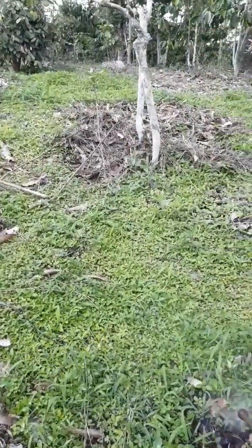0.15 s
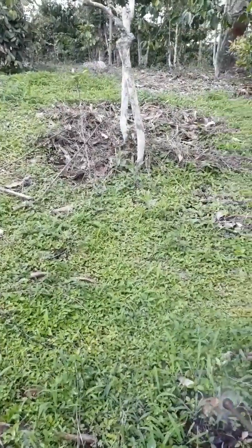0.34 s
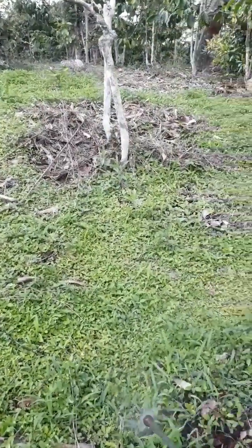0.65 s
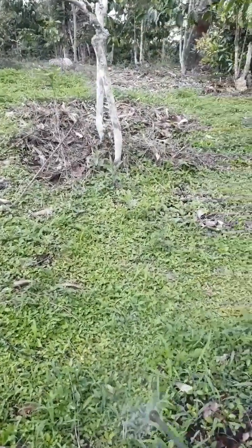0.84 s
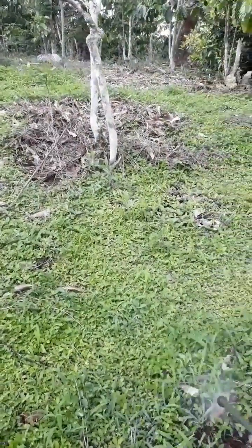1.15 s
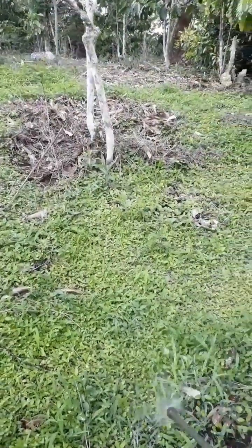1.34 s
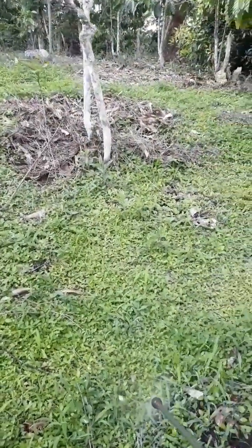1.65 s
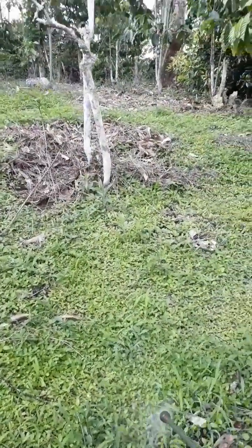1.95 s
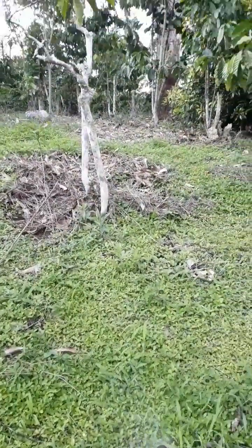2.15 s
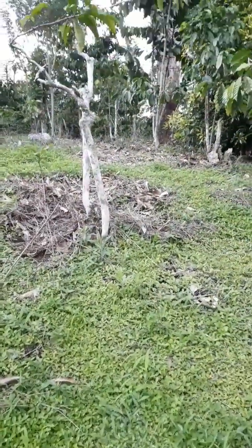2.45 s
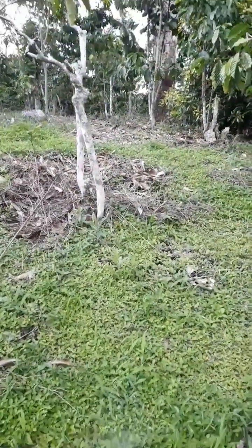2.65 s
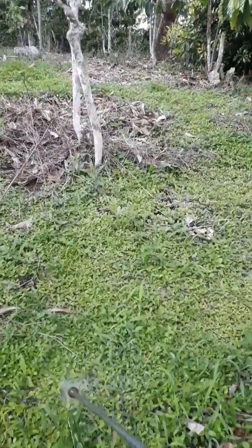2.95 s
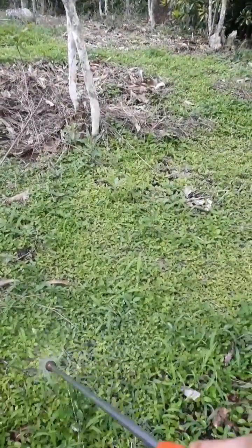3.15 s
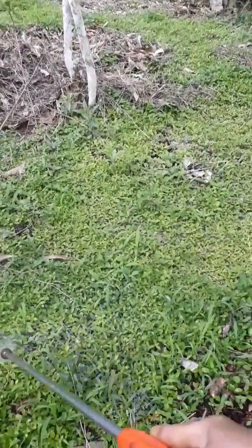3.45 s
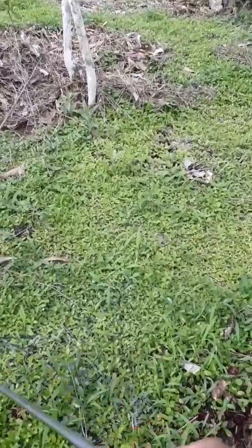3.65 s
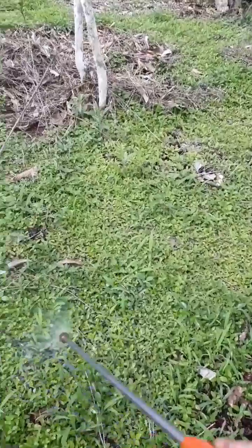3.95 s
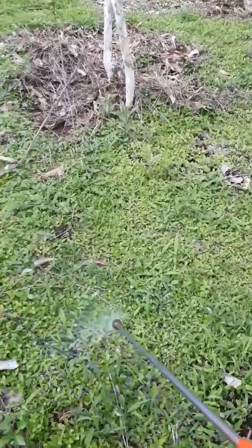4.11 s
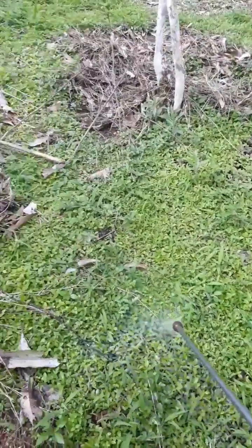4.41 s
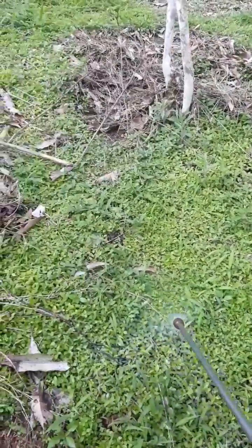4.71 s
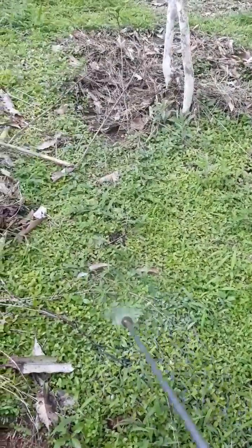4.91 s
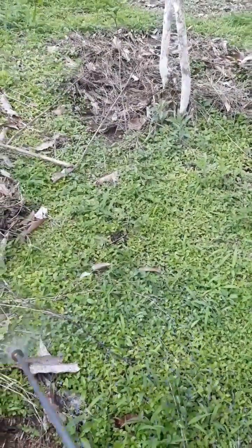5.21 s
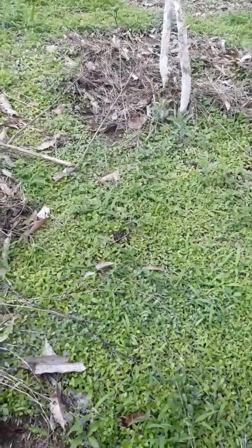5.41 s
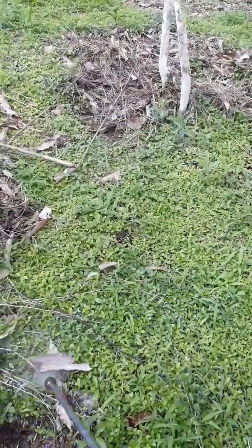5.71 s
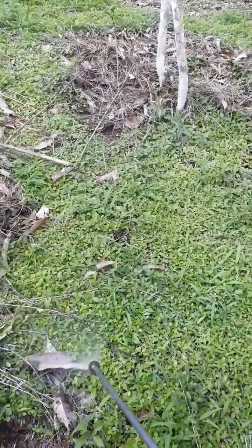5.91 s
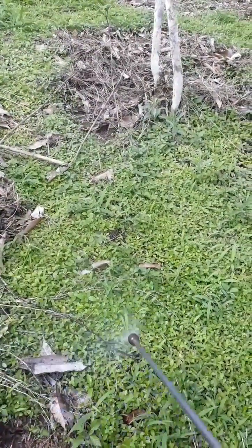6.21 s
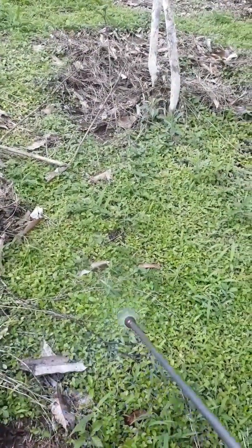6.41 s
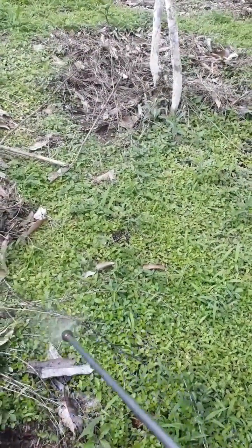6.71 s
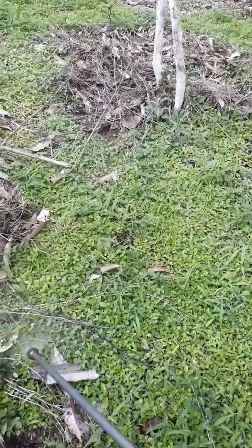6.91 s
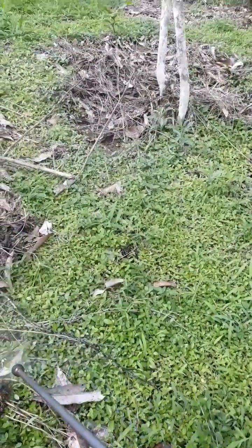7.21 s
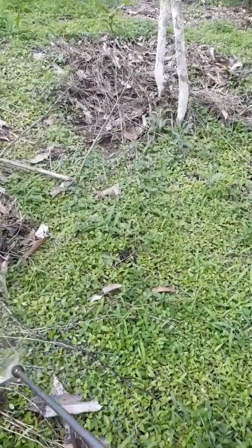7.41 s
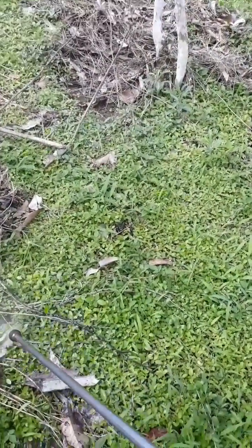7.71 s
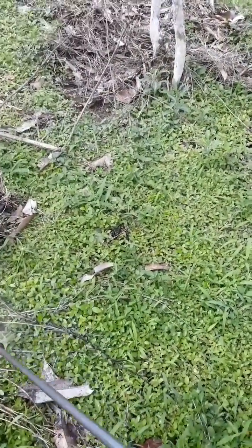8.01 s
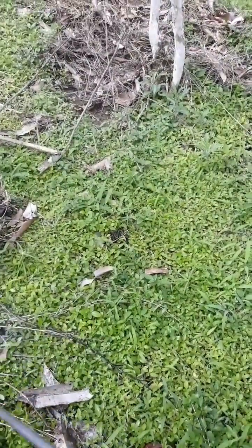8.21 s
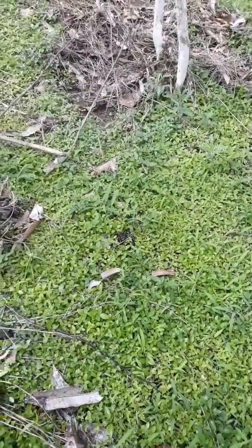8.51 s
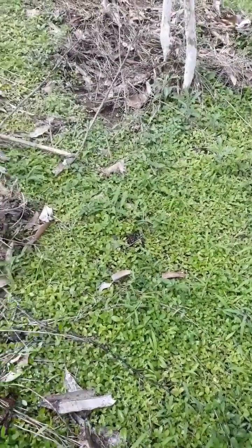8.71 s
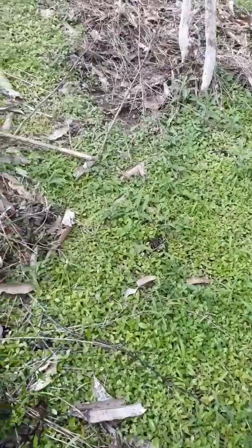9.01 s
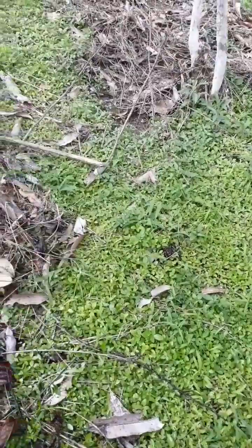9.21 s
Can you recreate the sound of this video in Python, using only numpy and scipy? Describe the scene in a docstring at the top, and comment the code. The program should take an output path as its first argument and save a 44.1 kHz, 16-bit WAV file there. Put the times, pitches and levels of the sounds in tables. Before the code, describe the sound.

A steady, bright nozzle hiss fills an open orchard, heard close and centred in mono over a faint low air bed. Fine droplets fizz on green leaves and patter drily on litter in uneven passes. Early low wind buffets bump the microphone, with weaker ones around four and a half seconds. Small hard ticks and short rustles dot the spray, which is fullest in the last seconds and never stops.

```python
"""An orchard, where a hand lance sprays a fine mist over the ground, close to a mono microphone.
The nozzle is steady turbulent hiss; the sweeping mist is noise and clicks, coloured by green leaves or dry litter.
Ground echoes comb the spray. Puffs of wind buffet the microphone as low noise and single pressure swings.
The lance and a few large drops tick with damped modes, and leaves rustle in brief bands of noise."""
import sys
import numpy as np
from scipy import signal
from scipy.fft import rfft, irfft
from scipy.io import wavfile
from scipy.ndimage import uniform_filter1d

SR = 44100
rng = np.random.default_rng(int(sys.argv[2]) if len(sys.argv) > 2 else 0)


def master_out(mix):
    """Clip the mix to full scale and print it as 16-bit PCM to the path in sys.argv[1]."""
    frames = np.transpose(np.atleast_2d(mix))
    ceiling = np.clip(frames, -1, 1)
    pcm = np.round(ceiling * 32767).astype(np.int16)
    wavfile.write(sys.argv[1], SR, pcm)


N = 412335  # length in samples
FRAME = 512  # samples in a frame of the moving filters
TIME = np.arange(N) / SR


def amp(db):
    """Turns decibels into gain."""
    return 10 ** (np.asarray(db) / 20)


def evened(x):
    """Scales a signal or field to an rms of 1."""
    return x / np.sqrt(np.mean(x ** 2) + 1e-20)


def spectrum(points, hz):
    """Reads a (freq_hz, level_db) table on a log-frequency axis."""
    point_hz, point_db = np.transpose(points)
    return np.interp(np.log(hz + 1), np.log(point_hz + 1), point_db)


def curves(rows, t):
    """Reads every column of a timed table at the times t, gliding between rows."""
    row_s, *columns = np.transpose(rows)
    return [np.interp(t, row_s, column) for column in columns]


def swells(rows, t, rise_db_per_s, fall_db_per_s):
    """Power of each (start, length, level) row at the times t: it rises before the start, holds and falls."""
    start, length, level_db = np.transpose(rows)[:3, :, None]
    early = np.maximum(start - t, 0)
    late = np.maximum(t - start - length, 0)
    swell_db = level_db - rise_db_per_s * early - fall_db_per_s * late
    return amp(np.maximum(swell_db, -600)) ** 2


def add(mix, start_s, sound):
    """Mixes a sound in at start_s seconds."""
    part = mix[max(round(start_s * SR), 0):][:len(sound)]
    part += sound[:len(part)]


def coloured(x, points):
    """Filters x by a fixed spectrum."""
    hz = np.fft.rfftfreq(len(x), 1 / SR)
    return irfft(rfft(x) * amp(spectrum(points, hz)), len(x))


def shaped(x, field_db, size=FRAME):
    """Filters x by a moving spectrum, field_db(hz, t)."""
    overlap = size * 3 // 4
    hz, t, frames = signal.stft(x, SR, nperseg=size, noverlap=overlap)
    frames = frames * amp(field_db(hz[:, None], t))
    return signal.istft(frames, SR, nperseg=size, noverlap=overlap)[1][:N]


def patches(hz, t, wide_hz, long_s):
    """Random field smoothed over frequency and time, rms 1."""
    field = rng.standard_normal((len(hz), len(t)))
    bins = max(round(wide_hz * FRAME / SR), 1)
    frames = max(round(long_s / t[1]), 1)
    field = uniform_filter1d(field, bins, 0)
    return evened(uniform_filter1d(field, frames, 1))


def white():
    """Noise of 0 dB per Hz."""
    return np.sqrt(SR / 2) * rng.standard_normal(N)


# outdoor air: freq_hz [Hz], level_db [dB per Hz]
AIR_SPECTRUM = [(20, -116), (45, -86), (80, -82), (135, -75), (200, -85.5), (290, -80.5), (390, -76),
                (600, -87.5)]


def air():
    """The low, steady noise bed of the air outdoors."""
    return coloured(white(), AIR_SPECTRUM)


# puffs of wind on the microphone: start_s [s], length_s [s], level_db [relative dB]
WIND_PUFFS = [(1.135, 0.011, -35), (1.205, .04, -32), (1.32, 0.094, -17.5), (1.45, 0.11, -22),
              (1.6, 0.12, -18), (1.88, 0.13, -26.5), (2.035, 0.013, -17.5), (2.16, 0.034, -26.5),
              (2.46, 0.21, -38.5), (4.54, .025, -38), (4.64, .03, -44), (4.72, 0.032, -36),
              (4.833, 0.011, -33), (7.87, .02, -50), (8.0, .05, -47)]
# colour of a full gust: freq_hz [Hz], level_db [relative dB]
FULL_GUST_SPECTRUM = [(15, -62), (35, -20), (70, 0.5), (110, 1), (160, 1.5), (260, -6.5), (400, -21),
                      (650, -41), (1200, -55), (3000, -90)]


def wind(level_db=-3, full_db=-21, dulling=1.0, knee_hz=130, rise_db_per_s=450, fall_db_per_s=286):
    """Lumpy low turbulence at the microphone; weak gusts are duller than strong ones."""
    gust_power = swells(WIND_PUFFS, TIME, rise_db_per_s, fall_db_per_s).max(0)
    gust_db = 10 * np.log10(gust_power)

    def dullness(hz, t):
        """Treble loss in dB, deeper the further a gust is below full strength."""
        weakness_db = np.clip(full_db - np.interp(t, TIME, gust_db), 0, 20)
        return -dulling * weakness_db * np.log2(1 + (hz / knee_hz) ** 2) / 2

    flow = shaped(coloured(white(), FULL_GUST_SPECTRUM), dullness)
    # level out the flow, so that the gust alone sets the strength
    flow = flow / np.sqrt(uniform_filter1d(flow ** 2, size=2200) + 1e-12)
    return flow * amp(gust_db + level_db)


# strongest eddies at the microphone: centre_s [s], peak_db [relative dB], pitch_hz [Hz]
EDDY_THUMPS = [(1.341, -12, 111), (1.477, -11, 207), (1.519, -7, 159), (1.603, -8.5, 208),
               (1.635, -15, 198), (1.709, -12.5, 139), (1.726, -18, 260), (2.048, -11.5, 169),
               (2.545, -28, 108), (2.64, -26, 100), (4.546, -25.5, 112), (4.719, -27.5, 100)]


def thumps(level_db=-2):
    """Each eddy thumps the microphone with one swing of pressure, down and up."""
    out = np.zeros(N)
    t = np.arange(-900, 900) / SR
    for centre_s, peak_db, pitch_hz in EDDY_THUMPS:
        phase = 2 * np.pi * pitch_hz * t
        swing = phase * np.exp((1 - phase ** 2) / 2)
        add(out, centre_s + t[0], amp(peak_db + level_db) * swing)
    return out


# rustles and splashes among the leaves: start_s [s], length_s [s], level_db [dB rms], centre_hz [Hz]
LEAF_RUSTLES = [(0.204, .22, -44.5, 2140), (1.81, 0.057, -41, 3220), (3.601, 0.27, -42, 1880),
                (3.867, 0.019, -32.5, 6040), (3.87, 0.077, -43, 900), (3.908, .04, -36, 3180),
                (6.757, .02, -41, 1000), (6.89, .014, -37, 2400), (8.252, 0.22, -44, 1800),
                (8.665, .055, -40.5, 590), (8.714, 0.02, -36, 860)]


def rustles(width_octaves=0.32):
    """Brief scuffs of noise, each in its own band."""
    out = np.zeros(N)
    for start_s, length_s, level_db, centre_hz in LEAF_RUSTLES:
        n = round(length_s * SR)
        octaves = np.log2((np.fft.rfftfreq(n, 1 / SR) + 1) / centre_hz)
        band = np.exp(-(octaves / width_octaves) ** 2 / 2)
        scuff = irfft(rfft(rng.standard_normal(n)) * band, n)
        add(out, start_s, amp(level_db) * evened(scuff * signal.windows.tukey(n, 0.5)))
    return out


# sharp ticks of the lance and of large drops: start_s [s], level_db [relative dB],
# tilt_db [dB per octave, about 4 kHz]
TICK_HITS = [(3.2439, -7.5, 1), (4.1220, -13.5, 2), (5.4277, -22, 4), (6.5648, -20.5, 3),
             (6.8931, -14.5, 3), (7.4573, -22, 6), (7.5147, -21, 13), (7.6753, -21, 3), (7.9184, -20, 11)]
# modes that a tick rings: pitch_hz [Hz], level_db [relative dB], t60_s [s to fall by 60 dB]
TICK_RINGS = [(906, -19, 0.029), (1620, -13, 0.0091), (3020, -8.5, 0.0041), (3750, -2.5, 0.0063),
              (4430, 0, 0.0037), (7660, -11, .004)]


def ticks(level_db=0, low_hz=600):
    """Short blows ring a few heavily damped modes."""
    out = np.zeros(N)
    t = np.arange(2000) / SR
    for start_s, hit_db, tilt_db in TICK_HITS:
        for pitch_hz, mode_db, t60_s in TICK_RINGS:
            start_db = hit_db + mode_db + tilt_db * np.log2(pitch_hz / 4000)
            ring_db = start_db - 60 * t / t60_s
            add(out, start_s, amp(ring_db + level_db) * np.sin(2 * np.pi * pitch_hz * t))
    # small parts radiate no bass
    bass_cut = signal.butter(2, low_hz, "highpass", fs=SR, output="sos")
    return signal.sosfilt(bass_cut, out)


def patter(per_s, spread_db, share):
    """Tiny droplets blur to noise; larger ones, with their share of the power, click singly. 0 dB per Hz."""
    size_db = spread_db * np.minimum(rng.exponential(1, N), 5)
    size = amp(size_db) * rng.choice([-1, 1], N)
    clicks = evened(size * (rng.random(N) < per_s / SR))
    return np.sqrt(1 - share) * white() + np.sqrt(share * SR / 2) * clicks


# mist on dry litter: freq_hz [Hz at pitch factor 1], level_db [relative dB per Hz]
LITTER_SPECTRUM = [(990.0, -83), (2470.0, -71), (3020.0, -74), (3330.0, -63.5), (3600.0, -64),
                   (4000.0, -62.5), (4470.0, -65), (5380.0, -63.5), (6710.0, -79.5), (7500.0, -68.5),
                   (9130.0, -79.5), (15390.0, -74.5)]
# the mist crosses dry litter: start_s [s], length_s [s], level_db [relative dB], pitch [factor],
# ring_hz [Hz of one leaf's lower mode], ring_db [dB added at that mode]
LITTER_SWEEPS = [(0, 0.36, -3, .94, 3040, 2.5), (.52, 0.24, -7.5, 0.91, 3420, 5.5),
                 (0.946, 0.34, -7, 1, 3850, 4), (1.5, 0.45, -11.5, 0.97, 3500, 1),
                 (2.02, 0.18, -5.5, 0.95, 3550, 1), (2.33, 0.62, -8, 0.94, 3550, 1.5),
                 (3.75, .03, -4.5, .91, 3550, 1), (3.907, .03, -3, 0.97, 3550, -4),
                 (6.806, 0.12, -7, 1.16, 3650, 6), (7.04, 0.48, -0.5, 1.004, 3650, 9.5),
                 (7.65, 0.29, -2.5, 0.98, 3640, 6.5), (8.094, 0.29, 1.9, 0.96, 3630, 6.5),
                 (8.657, 0.2, -7, 0.78, 3450, 0), (8.95, 0.28, -5, 0.92, 3100, 5)]


def litter(hz, t, body_db=-1.54, rest_db=-25, rise_db_per_s=59, fall_db_per_s=80, patchy_db=0.5,
           flutter_db=1.16, ring_width_hz=190, upper_hz=5080, upper_share=0.22):
    """Dry leaves under mist ring in a broad band set by their size; one leaf has two modes of its own."""
    passes = swells(LITTER_SWEEPS, t, rise_db_per_s, fall_db_per_s)
    # the patch that takes most of the mist sets the colour
    pitch, ring_hz, ring_db = np.transpose(LITTER_SWEEPS)[3:] @ (passes / passes.sum(0))
    lower_mode = 1 / (1 + ((hz - ring_hz) / ring_width_hz) ** 2)
    upper_mode = upper_share / (1 + ((hz - upper_hz) / ring_width_hz) ** 2)
    colour_db = spectrum(LITTER_SPECTRUM, hz / pitch) + ring_db * (lower_mode + upper_mode)
    level_db = body_db + 10 * np.log10(passes.sum(0) + amp(rest_db) ** 2)
    flutter = flutter_db * patches(hz, t, wide_hz=8900, long_s=0.02)
    patchiness = patchy_db * patches(hz, t, wide_hz=400, long_s=0.14)
    return colour_db + level_db + flutter + patchiness


# mist on green leaves: freq_hz [Hz], level_db [relative dB per Hz]
LEAF_SPECTRUM = [(600.0, -83.5), (1120.0, -78), (1430.0, -68.5), (2300.0, -71), (3100.0, -68),
                 (3980.0, -59.5), (5140.0, -58), (6530.0, -67), (7980.0, -64.5), (10100.0, -76),
                 (12920.0, -70.5), (15500.0, -69)]
# the mist crosses green leaves: start_s [s], length_s [s], level_db [relative dB]
LEAF_SWEEPS = [(.48, .04, -10), (1.1, 0.71, -14.5), (3.0, .4, -13.5), (3.53, 0.23, -5.5),
               (3.9, 0.26, -13.5), (5.33, 0.34, 0), (5.95, 0.035, -7.5), (6.3, 0.24, -14),
               (7.03, .66, -6.5), (7.9, 0.13, -10.5), (8.28, 0.48, -4), (8.68, 0.27, -2.5),
               (9.22, 0.15, -7)]


def leaves(hz, t, rest_db=-19, rise_db_per_s=79, fall_db_per_s=54, patchy_db=1.17, flutter_db=0.44):
    """Mist on green leaves: a bright fizz that swells with each pass and flutters as they shake."""
    passes = swells(LEAF_SWEEPS, t, rise_db_per_s, fall_db_per_s)
    level_db = 10 * np.log10(passes.max(0) + amp(rest_db) ** 2)
    flutter = flutter_db * patches(hz, t, wide_hz=9000, long_s=0.017)
    patchiness = patchy_db * patches(hz, t, wide_hz=600, long_s=0.11)
    return spectrum(LEAF_SPECTRUM, hz) + level_db + flutter + patchiness


# nozzle hiss before its aim is applied: freq_hz [Hz], level_db [dB per Hz]
NOZZLE_SPECTRUM = [(300.0, -78), (420.0, -78.5), (600.0, -78), (1020.0, -77.5), (1240.0, -76),
                   (1590.0, -75), (1930.0, -72.5), (2700.0, -74.5), (4590.0, -78), (6300.0, -72),
                   (10120.0, -82), (13200.0, -79), (14440.0, -78), (15490.0, -80)]
# how the nozzle faces the microphone: time_s [s], hiss_db [relative dB],
# tilt_db [dB per octave, about 3 kHz], sizzle_db [dB added to the top treble]
NOZZLE_AIM = [(0, 0, 0.6, 1), (.7, -1.4, -1.1, 4), (1.2, -0.7, -0.6, 4), (1.8, -4, -1, 7),
              (2.4, -1, -.5, 2), (2.9, -2, -1, 5), (3.4, -1.5, -.4, 6), (3.77, 1.1, -0.9, -9),
              (4.2, -.6, -.2, 0), (4.9, .5, 0.2, -6), (5.4, -2, 0, 5), (5.9, 2.5, 0.8, -4),
              (6.45, -0.8, -1.5, 4), (6.85, 1.5, -.5, -1), (7.45, -1.3, -0.5, -2), (8.1, 1.5, 0.6, -11),
              (8.45, 4.8, 1.7, -5), (9.35, 4, 0.9, -5)]


def nozzle(hz, t, patchy_db=1.1, low_hz=260, sizzle_hz=14500, sizzle_width_hz=1700):
    """Turbulent hiss whose level, tilt and top sizzle follow how the nozzle faces the microphone."""
    hiss_db, tilt_db, beam_db = curves(NOZZLE_AIM, t)
    low_cut_db = -10 * np.log10(1 + (low_hz / (hz + 1)) ** 6)
    octaves = np.log2(np.maximum(hz, low_hz) / 3000)
    body_db = spectrum(NOZZLE_SPECTRUM, hz) + hiss_db + tilt_db * octaves
    # the highest treble leaves the nozzle in a narrow beam
    sizzle_db = beam_db * np.exp(-((hz - sizzle_hz) / sizzle_width_hz) ** 2)
    patchiness = patchy_db * patches(hz, t, wide_hz=500, long_s=0.39)
    return body_db + sizzle_db + low_cut_db + patchiness


def echo_band(hz, low_hz=450, top_hz=3300):
    """The ground returns the middle of the spectrum; grass swallows the treble."""
    treble_loss = 1 / (1 + (hz / top_hz) ** 4)
    bass_loss = 1 / (1 + (low_hz / (hz + 1)) ** 4)
    return treble_loss * bass_loss


# ground echoes as the lance is raised and lowered: time_s [s], upright_ms [ms delay],
# upright [strength 0-1], inverted_ms [ms delay], inverted [strength 0-1]
GROUND_ECHOES = [(0, 1.65, 0.16, 1.2, .2), (.9, 1.52, 0.27, 1.07, .28), (1.4, 1.66, .1, 1.28, .04),
                 (2.8, 1.67, 0.23, 1.3, 0.18), (4, 1.63, 0.15, 1.35, 0.2), (4.5, 1.44, .28, 1.6, .13),
                 (5, 1.5, .38, 1.82, 0.24), (5.5, 1.24, .1, 1.83, 0.1), (6.45, 1.56, 0.25, 1.87, .24),
                 (7.05, 1.5, 0.12, 1.06, 0.01), (8.4, 1.25, 0, 1.03, .24), (9.35, 1.44, .1, 1.06, 0.02)]


def ground_echo(hz, t):
    """Two echoes off the ground cut combs into the spray that slide with the height of the lance."""
    upright_ms, upright, inverted_ms, inverted = curves(GROUND_ECHOES, t)
    turn_per_ms = -2j * np.pi * hz / 1000
    echoes = upright * np.exp(turn_per_ms * upright_ms) - inverted * np.exp(turn_per_ms * inverted_ms)
    return 20 * np.log10(abs(1 + echo_band(hz) * echoes) + 1e-6)


def spray():
    """Nozzle hiss and the patter of mist on leaves and litter, combed by the ground echoes."""
    direct = shaped(white(), nozzle)
    direct += shaped(patter(per_s=3500, spread_db=4.0, share=0.25), leaves)
    direct += shaped(patter(per_s=2200, spread_db=2.5, share=0.22), litter)
    # longer frames resolve the teeth of the comb
    return shaped(direct, ground_echo, size=2048)


def scene():
    """The spray and all around it, the same in both channels."""
    mono = air() + wind() + thumps() + rustles() + ticks() + spray()
    return np.array([mono, mono])


# treble resonance of the microphone: freq_hz [Hz], gain_db [dB]
MIC_RESONANCE = [(6590.0, -1.0), (7290.0, 1.95), (8360.0, 7), (8770.0, 6.5), (9530.0, 0.3), (10100.0, -0.3),
                 (11640.0, 1.56)]


def record(dry, bass_cut_hz=42, edge_hz=15600):
    """The microphone's colour and bass cut, then a steep treble limit."""
    heard = np.array([coloured(channel, MIC_RESONANCE) for channel in dry])
    bass_cut = signal.butter(2, bass_cut_hz, "highpass", fs=SR, output="sos")
    heard = signal.sosfilt(bass_cut, heard)
    band_limit = signal.firwin(511, edge_hz, window=("kaiser", 9), fs=SR)
    return signal.oaconvolve(heard, band_limit[None], "same")


dry = scene()
out = record(dry)
master_out(out)
```